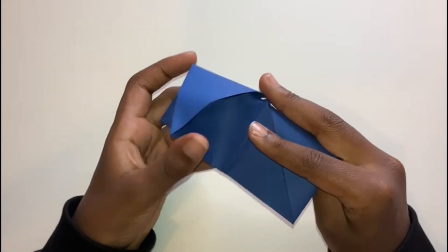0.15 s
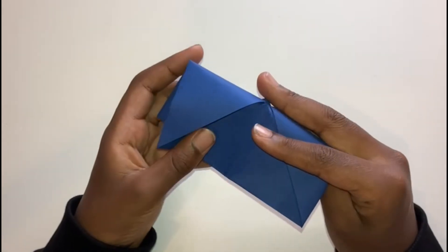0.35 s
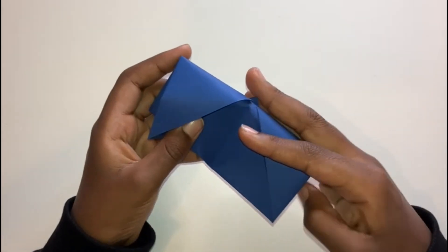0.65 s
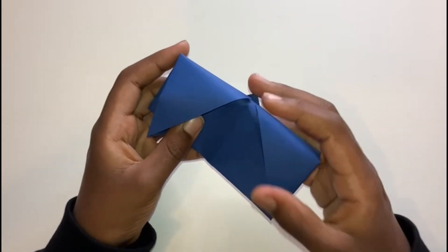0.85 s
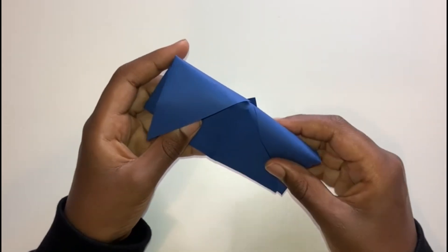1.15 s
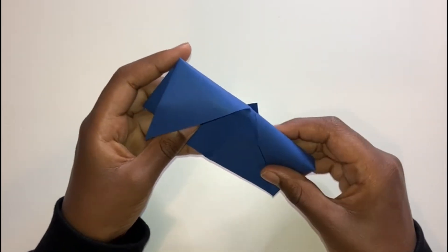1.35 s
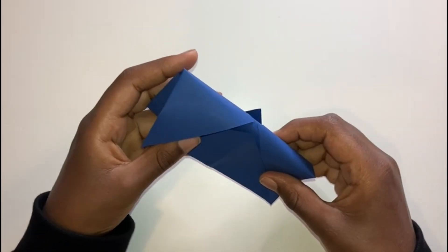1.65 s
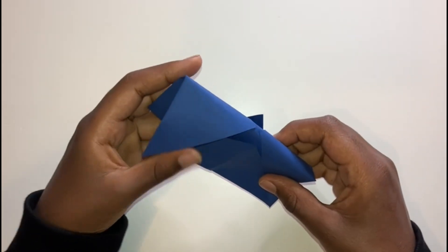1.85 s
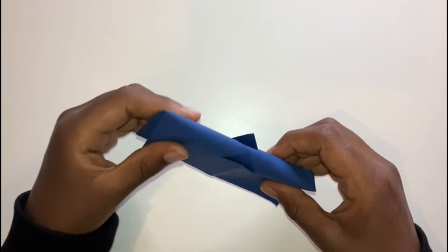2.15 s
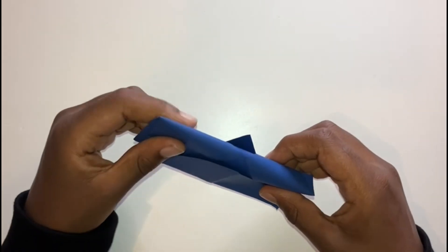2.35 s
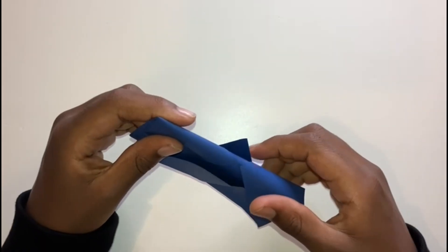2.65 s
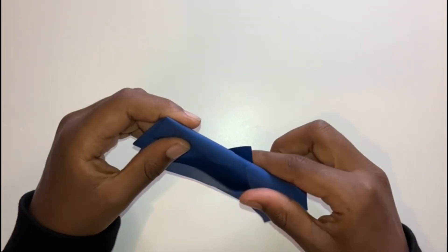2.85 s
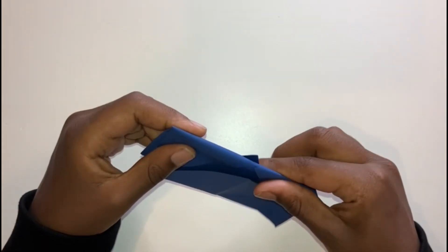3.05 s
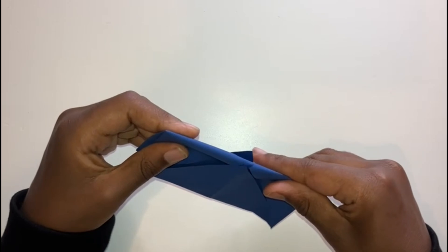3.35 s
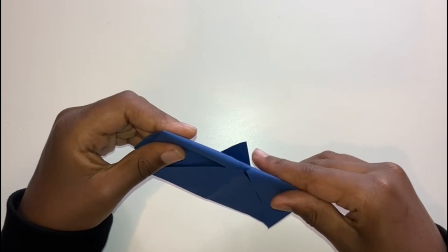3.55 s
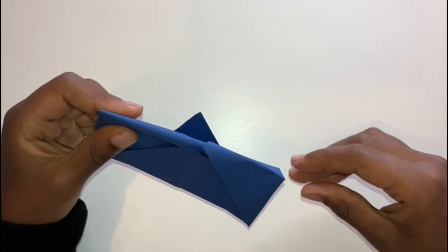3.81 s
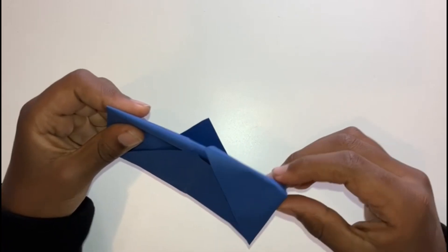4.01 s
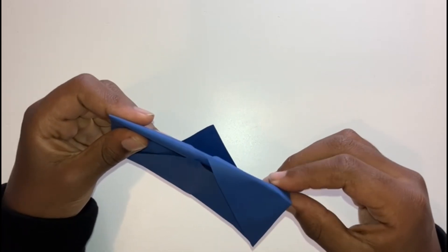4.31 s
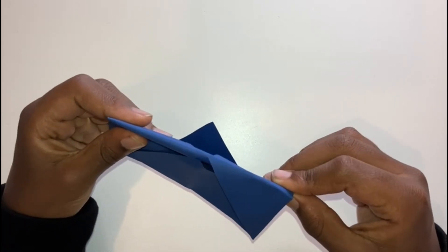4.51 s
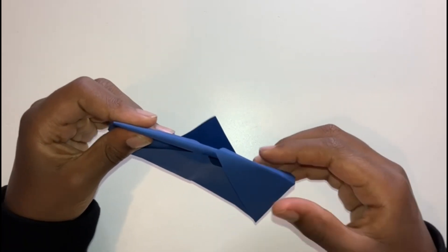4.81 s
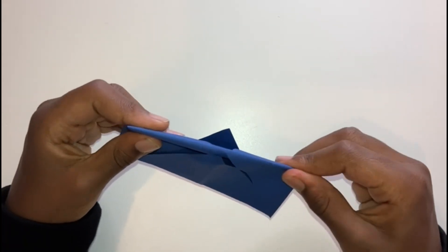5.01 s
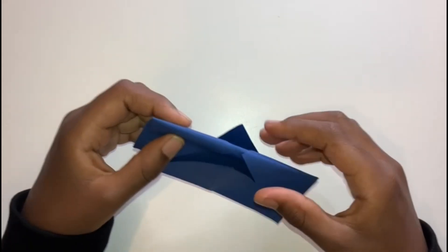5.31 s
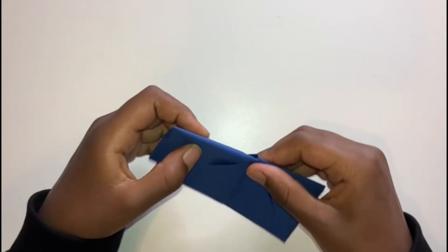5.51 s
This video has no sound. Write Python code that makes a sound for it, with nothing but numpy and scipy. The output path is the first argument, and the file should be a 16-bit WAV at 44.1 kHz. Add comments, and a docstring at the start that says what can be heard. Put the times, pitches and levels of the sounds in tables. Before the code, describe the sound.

Folded paper is creased by hand, with irregular sharp snaps, small crackles and a soft hiss of sliding fingertips.

```python
"""A folded paper sheet is creased in two hands above a table. It buckles in short snaps and crackles;
fingertips slide along the folds with a fine hiss. Hands and arms bump softly on the table.
Two close microphone ports hear the sheet, a small room answers, and ventilation rumbles
and hums far away."""
import sys
import numpy as np
from scipy import signal
from scipy.fft import rfft, irfft, next_fast_len
from scipy.io import wavfile
from scipy.ndimage import uniform_filter1d, minimum_filter1d, map_coordinates

SR = 44100
rng = np.random.default_rng(int(sys.argv[2]) if len(sys.argv) > 2 else 0)


def generate_wav(sig):
    """Save sig (samples, or channels by samples) to the path in sys.argv[1] as 16-bit PCM at SR."""
    pcm = np.round(np.clip(np.atleast_2d(sig).T, -1, 1) * 32767).astype(np.int16)
    wavfile.write(sys.argv[1], SR, pcm)


N = 250047

# buckles of the sheet: t/s, pop level/dB, pop f/Hz, crack level/dB
BUCKLES = [(0.0877, -29, 1190, -67), (0.129, -37, 1230, -44), (0.139, -45, 1280, -42),
           (0.1535, -29, 1260, -37), (0.242, -56, 2430, -52), (0.4112, -49.5, 2320, -32.5),
           (0.6196, -42.5, 1510, -33.5), (0.635, -38.5, 1320, -47), (0.6465, -42.5, 1280, -32.5),
           (0.656, -70, 1400, -45), (0.7112, -44.5, 2920, -40.5), (0.8395, -30, 1690, -55),
           (0.849, -47, 2000, -39), (0.8786, -19, 1596, -11.5), (0.9275, -23, 3240, -34),
           (1.0356, -35.5, 2910, -50), (1.3077, -36, 2100, -34), (1.3402, -54, 2360, -42),
           (1.473, -46, 2620, -43.5), (1.698, -38.5, 2100, -94), (1.8233, -38, 2170, -40),
           (1.864, -40.5, 3000, -39), (1.9786, -48, 2800, -59), (2.116, -49, 990, -57),
           (2.1447, -48, 1010, -61), (2.1697, -37.5, 1150, -52.5), (2.1955, -35, 2400, -71),
           (2.196, -36.5, 836, -55), (2.4499, -47, 857, -57), (2.8297, -39, 2280, -60),
           (2.8697, -35, 1530, -37), (2.9062, -25, 2570, -27), (3.043, -50, 1840, -65),
           (3.0579, -44.5, 1130, -49), (3.068, -49, 960, -63), (3.0805, -49, 1680, -54),
           (3.185, -43.5, 1460, -69), (3.2106, -31.5, 2200, -41), (3.216, -21.5, 2360, -16.5),
           (3.2525, -19, 3000, -10.5), (3.342, -43, 1030, -51), (3.356, -46, 770, -45),
           (3.3775, -48.5, 840, -39.5), (3.5507, -46.5, 1320, -38), (3.57, -55, 2040, -50),
           (3.6085, -36.5, 1520, -42), (3.658, -60.5, 2810, -31), (3.9177, -71.5, 2510, -53.5),
           (3.9721, -55, 3520, -50), (4.0332, -52, 2850, -52), (4.3032, -66, 3440, -51),
           (4.348, -21, 4350, -4), (4.5899, -50.5, 1935, -39.5), (4.641, -48, 2650, -42),
           (4.8361, -56, 2020, -55), (4.8595, -28.5, 3370, -31.5), (4.9199, -38.5, 2700, -50.5),
           (5.0407, -67, 2160, -51), (5.1162, -53, 3080, -53.5), (5.1448, -67, 2610, -42),
           (5.196, -51.5, 1440, -47.5), (5.225, -49.5, 1700, -54.5), (5.2595, -55, 3190, -46.5),
           (5.428, -44.5, 1657, -42.5), (5.4542, -30, 3220, -24.5), (5.505, -38.5, 1380, -31),
           (5.5361, -40, 1300, -49.5), (5.5611, -38, 1900, -42), (5.571, -49.5, 890, -63),
           (5.5844, -43.5, 1350, -55), (5.6484, -27.5, 2350, -17.5)]
# crack spectrum: f/Hz, level/dB
CRACK_SPECTRUM = [(3000, -28), (4300, 2), (6500, 1.5), (8000, -7), (9300, -1.5), (10800, 0.5),
                  (12500, -5.5)]
def snaps(buckles):
    """A buckling panel pops in a few swings, with a ragged crack, a weak rattle and the table's echo."""
    pop_periods, pop_tone, crack_spike = 3.6, 0.71, 0.69
    crack_decay_s, rattle_t60_s, echo_s = 0.0013, 0.029, 0.0024
    lead_in = 352
    out, t = np.zeros(N + SR), np.arange(-lead_in, 1400) / SR
    for start_s, pop_db, pop_hz, crack_db in buckles:
        age = np.maximum(t, 0) * pop_hz / pop_periods  # a wide panel pops lower and longer
        swing = age ** .45 * np.exp(-2.2 * age)
        swing /= np.linalg.norm(swing)
        edge = (t > 0) * np.exp(-t / crack_decay_s)
        edge /= np.linalg.norm(edge)
        burst = np.array([swing, edge]) * rng.standard_normal(len(t))  # rows: pop, crack
        burst[1] += crack_spike * (t == 0)
        rattle = (t > 0) * amp(-29.5 - 60 * t / rattle_t60_s) * rng.standard_normal(len(t))
        parts = filtered(burst + rattle,
                         lambda hz: [pop_response(hz, pop_hz), amp(along(CRACK_SPECTRUM, hz))])
        parts[0] += pop_tone * swing * np.sin(2 * np.pi * (pop_hz * t + rng.random()))
        onset_rms = np.sqrt(np.mean(parts[:, lead_in:lead_in + 88] ** 2, axis=1))  # first 2 ms
        out[round(start_s * SR):][:len(t)] += amp([pop_db, crack_db]) / onset_rms @ parts
    direct = out[lead_in:][:N]
    return direct + amp(-18) * np.pad(direct, (round(echo_s * SR), 0))[:N]


# air resonances in the folds: f/Hz, width/Hz, level/dB
FOLD_MODES = [(1193, 450, 2.5), (2740, 400, -1)]
def pop_response(hz, pop_hz):
    """A broad peak at the panel's pitch, coloured by air ringing in the hollow folds."""
    octaves = np.log2((hz + 1) / pop_hz)
    panel = amp(np.minimum(2.5 * octaves, -4 * octaves ** 2))
    folds = sum(amp(db) * 1j * hz * width / (mode_hz ** 2 - hz ** 2 + 1j * hz * width)
                for mode_hz, width, db in FOLD_MODES)
    return panel * (1 + folds)


def crackles(hiss_level, body_level):
    """Rows of small buckles at chance moments, their strength following the strokes."""
    rate_per_s = 6.3
    when, pitch, size, dullness = rng.random((int(rate_per_s * N / SR), 4)).T
    at = (when * N).astype(int)
    offset_db = -7.5 - 0.5 * np.log(size + 1e-3)
    pop_db = 20 * np.log10(body_level[at]) + offset_db
    crack_db = 20 * np.log10(hiss_level[at]) + offset_db - 10 * dullness
    pop_hz = 900 * 4 ** pitch
    return list(zip(at / SR, pop_db, pop_hz, crack_db))


# fingertip strokes: t/s, length/s, hiss start level/dB, hiss end level/dB, body re hiss/dB
FINGER_STROKES = [(0.0, 0.037, -78, -82, 12), (0.049, 0.044, -58, -45.5, 8),
                  (0.151, 0.0093, -44.5, -54.5, 10.5), (0.234, 0.16, -69.5, -53, 4.5),
                  (0.412, 0.0062, -41, -49, 1), (0.424, 0.12, -52, -42.5, -2),
                  (0.562, 0.073, -63, -65, 8.5), (0.621, 0.033, -46.5, -40, -2.5),
                  (0.709, 0.0085, -37, -43.5, -3), (0.773, 0.1, -82, -51, 8), (0.889, 0.21, -44, -58, 0.5),
                  (1.025, 0.025, -46.5, -43, -3), (1.055, 0.11, -51.5, -56, 0.5),
                  (1.255, 0.037, -54, -46.5, 0.5), (1.3, 0.078, -52.5, -63, 3),
                  (1.415, 0.16, -67.5, -53.5, 3.5), (1.654, 0.078, -92.5, -83.5, 23),
                  (1.765, 0.047, -73.5, -74, 15), (1.813, 0.056, -48.5, -51.5, 4),
                  (1.909, 0.1, -77, -52.5, 4), (1.983, 0.11, -50.5, -43.5, -8.5),
                  (2.108, 0.09, -64.5, -60, 11.5), (2.338, 0.041, -56.5, -50.5, -10.5),
                  (2.424, 0.098, -57, -50, -0.5), (2.741, 0.091, -62.5, -52.5, -2),
                  (2.858, 0.11, -71, -71.5, 20), (3.014, 0.12, -57, -46, -3),
                  (3.137, 0.065, -69, -69.5, 10.5), (3.21, 0.14, -46.5, -61.5, 12.5),
                  (3.368, 0.075, -49, -47, -9), (3.553, 0.0073, -44, -41.5, -3.5),
                  (3.569, 0.087, -44, -41, -4.5), (3.918, 0.021, -76.5, -77, 10.5),
                  (3.969, 0.099, -58, -66, -0.5), (4.033, 0.05, -49, -50.5, 2), (4.124, 0.055, -63, -64, 3),
                  (4.276, 0.11, -84.5, -54, 1.5), (4.586, 0.047, -60, -50, 3.5),
                  (4.702, 0.064, -55.5, -63.5, -15), (4.83, 0.1, -59, -61, 9), (4.913, 0.15, -64, -73.5, 2),
                  (5.119, 0.048, -72, -64, 5.5), (5.182, 0.098, -55.5, -75, 4),
                  (5.39, 0.12, -64.5, -54.5, 6), (5.495, 0.13, -60.5, -51, 0.5),
                  (5.647, 0.021, -38.5, -54, 6)]
def strokes():
    """Hiss and body envelopes: a finger touches, glides, drops in level as it stops, and lifts."""
    touch_db_per_s, stop_db, lift_db_per_s = 4004, 5, 398.5
    t = np.arange(N) / SR
    hiss, body = np.full(N, amp(-83.5)), np.full(N, amp(-81))  # holding fingers still creep
    for start_s, length_s, start_db, end_db, body_db in FINGER_STROKES:
        glide_db = start_db + (end_db - start_db) * np.clip((t - start_s) / length_s, 0, 1)
        before_s, after_s = np.maximum(start_s - t, 0), np.maximum(t - start_s - length_s, 0)
        release_db = np.minimum(touch_db_per_s * after_s, stop_db) + lift_db_per_s * after_s
        level = amp(glide_db - touch_db_per_s * before_s - release_db)
        hiss, body = np.hypot(hiss, level), np.hypot(body, amp(body_db) * level)
    return hiss, body


# spectra of the friction hiss and the sheet's body: f/Hz, level/dB
HISS_SPECTRUM = [(2500, -32.5), (4500, -6), (6300, -2), (7700, -2), (8700, -1), (10000, -4.5), (10700, 1),
                 (11500, -27.5)]
BODY_SPECTRUM = [(250, -14.5), (600, -9), (1000, -3), (1500, -4), (2700, -1.5), (4000, -2.5), (6000, -12.5),
                 (9000, -6.5), (11500, -24)]
def slide(hiss_level, body_level):
    """Skin catches on paper fibres: dense tiny slips, a few larger, heard as hiss and via the sheet."""
    catches_per_s = 200
    pressure = amp(2.2 * wobble(40) + 0.77 * wobble(200))
    catches = 3.5 * (rng.random(N) < catches_per_s / SR) * rng.exponential(1, N)
    slips = pressure * (rng.standard_normal((2, N)) + catches)
    # narrow, drifting random patches colour the rustle
    hiss = coloured(patchy(slips[0], depth_db=3, frame=384), HISS_SPECTRUM)
    body = coloured(patchy(slips[1], depth_db=3.5, frame=768), BODY_SPECTRUM)
    return hiss_level * hiss + body_level * body


# hands and arms on the table: t/s, f/Hz, level/dB, length/s
TABLE_BUMPS = [(0.152, 80, -54, 0.034), (0.828, 120, -55, 0.042), (0.89, 103, -60.5, 0.089),
               (2.692, 98, -63.5, 0.1), (3.24, 95, -62.5, 0.16), (4.868, 212, -50, 0.011),
               (5.42, 166, -57.5, 0.11), (5.658, 93.7, -49, 0.083)]
def bumps():
    """Each bump is a loose rub that swells once in a broad low mode of the table."""
    t, out, loss = np.arange(N) / SR, np.zeros(N), 0.36
    for start_s, mode_hz, db, length_s in TABLE_BUMPS:
        swell = np.sin(np.pi * np.clip((t - start_s) / length_s, 0, 1))
        mode = lambda hz: hz * mode_hz / (mode_hz ** 2 - hz ** 2 + 1j * loss * hz * mode_hz)
        out += amp(db) * swell * unit(filtered(rng.standard_normal(N), mode))
    return out


# left-right phase difference, in steps: f/Hz, phase/rad
PHASE_DIFFERENCE = [(0, 0.5), (1000, 1), (3800, 1.66), (4800, 3), (6100, 3.5), (7600, 6.5), (9600, 6),
                    (10700, 10), (12000, 10)]
# left port re right: f/Hz, level/dB
PORT_BALANCE = [(300, -1), (1000, -3.5), (2500, -2), (3800, -4), (4800, -1.5), (11000, 1)]
# likeness of the ports: f/Hz, coherence/1
PORT_COHERENCE = [(300, .35), (700, .4), (1200, .8), (2500, .7), (4500, .94), (9000, .97)]
def ports(x):
    """The sheet in stereo: the left sounds slightly earlier and, below the top treble, weaker."""
    spectra = signal.stft(np.pad(x, (48, 0)), nperseg=128)[2]
    scrambled = signal.istft(spectra * np.exp(2j * np.pi * rng.random(spectra.shape)), nperseg=128)[1][:N]
    side = np.array([[.5], [-.5]])
    mix_rad = lambda hz: np.arccos(along(PORT_COHERENCE, hz)) / 2
    phase_rad = lambda hz: np.interp(hz, *np.transpose(PHASE_DIFFERENCE))
    place = lambda hz: amp(side * along(PORT_BALANCE, hz)) * np.exp(1j * side * phase_rad(hz))
    coherent = filtered(x, lambda hz: place(hz) * np.cos(mix_rad(hz)))
    diffuse = filtered(scrambled, lambda hz: place(hz) * np.sin(mix_rad(hz)))
    return coherent + 2 * side * diffuse


# room decay: f/Hz, T60/s
ROOM_T60 = [(400, 0.11), (1500, 0.13), (2300, 0.027), (3500, 0.29), (5000, 0.3), (11000, 0.24)]
# wall reflections: f/Hz, level/dB
WALL_SPECTRUM = [(500, 4), (2500, 2.5), (5000, -11), (6000, -17.5), (8000, -7.5), (11500, -21.5)]
def room(x):
    """Each band echoes with its own strength and decay; moving hands change the echoes every 1/3 s."""
    out, step, predelay = np.zeros((2, N + SR)), SR // 3, 250
    for start in range(0, N, step):
        hz, t, spectra = signal.stft(rng.standard_normal((2, step)), SR, nperseg=256)
        tail_db = 3.7 * rng.standard_normal((len(hz), 1)) - 60 * t / along(ROOM_T60, hz)[:, None]
        mid, side = signal.istft(spectra * amp(tail_db), SR, nperseg=256)[1]
        tails = np.array([mid + .6 * side, mid - .6 * side])
        wet = signal.fftconvolve(x[None, start:start + step], tails / np.linalg.norm(tails[0]), axes=1)
        out[:, start + predelay:][:, :wet.shape[1]] += wet
    return filtered(out[:, :N], lambda hz: amp(along(WALL_SPECTRUM, hz)))


# rumble spectra, common to the ports and opposed in them: f/Hz, level/dB
RUMBLE_MID = [(15, -37.5), (30, -23), (45, 3), (70, -12), (100, -15.5), (160, -11.5), (250, -17.5),
              (330, -20.5), (450, -40.5), (1300, -51.5), (5000, -63.5), (11500, -60.5)]
RUMBLE_SIDE = [(15, -35), (45, -12.5), (150, -9.5), (300, -17), (500, -11.5), (1500, -22), (5000, -31.5),
               (11500, -42)]
# far tones: start t/s, end t/s, f/Hz, level/dB
HUM_TONES = [(0, 5.67, 214, -76), (.38, .8, 281, -72)]
def ventilation():
    """Far ventilation: a slightly wavering rumble and unsteady tones."""
    t, fade_s = np.arange(N) / SR, 0.004
    mid = amp(-68.5 + wobble(9.3)) * coloured(rng.standard_normal(N), RUMBLE_MID)
    side = amp(-70.5) * coloured(rng.standard_normal(N), RUMBLE_SIDE)
    for start_s, end_s, hz, db in HUM_TONES:
        gate = np.clip(np.minimum(t - start_s, end_s - t) / fade_s, 0, 1)
        mid += gate * amp(db + 5.6 * wobble(28)) * np.sin(2 * np.pi * hz * t + 0.19 * wobble(20))
    return np.array([mid + side, mid - side])


def amp(db):
    return 10 ** (np.asarray(db) / 20)


def unit(x):
    return x / np.sqrt(np.mean(x ** 2) + 1e-20)


def along(points, hz):
    """Interpolate (f/Hz, value) points on a log axis."""
    knots_hz, values = np.transpose(points)
    return np.interp(np.log(hz + 1), np.log(knots_hz + 1), values)


def wobble(knots_per_s):
    """Smooth random curve."""
    knots = rng.standard_normal(int(N * knots_per_s / SR) + 4)
    return map_coordinates(knots, [np.arange(N) * knots_per_s / SR])


def filtered(x, response):
    """Apply a complex frequency response."""
    size = next_fast_len(x.shape[-1] + 4096)
    return irfft(rfft(x, size) * response(np.fft.rfftfreq(size, 1 / SR)), size)[..., :x.shape[-1]]


def coloured(x, spectrum):
    """Shape by (f/Hz, level/dB) points, to rms 1."""
    return unit(filtered(x, lambda hz: amp(along(spectrum, hz))))


def patchy(x, depth_db, frame):
    """Random gain patches over time and frequency; a long frame gives narrow, lasting ones."""
    spectra = signal.stft(x, nperseg=frame)[2]
    field = uniform_filter1d(rng.standard_normal(spectra.shape), size=3, axis=0)
    field = uniform_filter1d(field, size=8, axis=1)
    return signal.istft(spectra * amp(depth_db * unit(field)), nperseg=frame)[1][:N]


def scene():
    """The sheet, direct and through the room, over ventilation and table bumps."""
    levels = strokes()
    sheet = slide(*levels) + snaps(list(BUCKLES) + crackles(*levels))
    return ports(sheet) + amp(-9.5) * room(sheet) + ventilation() + bumps()


# treble roll-off: f/Hz, level/dB
ROLL_OFF = [(10500, 0), (11600, -8), (12300, -24)]
def record(dry):
    """Band limit and fast limiter; only the tips of the loudest snaps pass full scale."""
    ceiling, cutoff_hz = 1.22, 12200
    heard = filtered(dry, lambda hz: amp(along(ROLL_OFF, hz)))
    needed_gain = ceiling / np.maximum(np.abs(heard).max(axis=0), ceiling)
    gain = uniform_filter1d(minimum_filter1d(needed_gain, size=41), size=21)
    return filtered(heard * gain, lambda hz: hz < cutoff_hz)


dry = scene()
out = record(dry)
generate_wav(out)
```